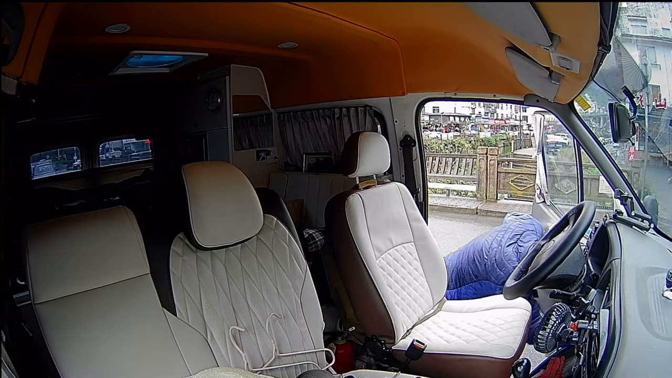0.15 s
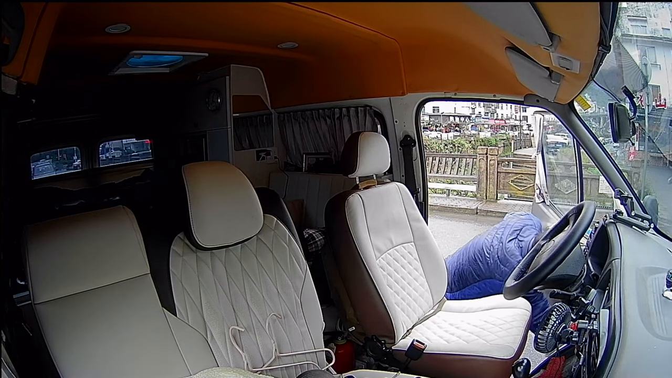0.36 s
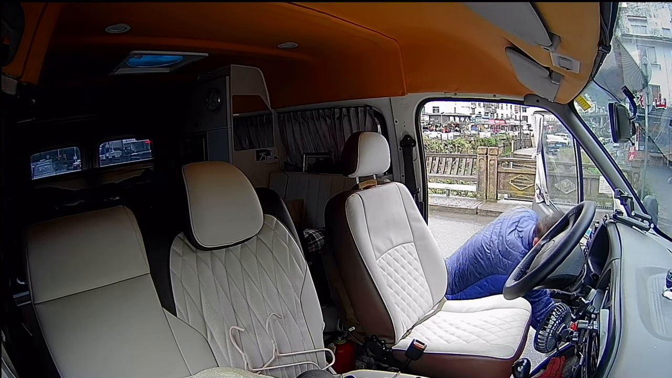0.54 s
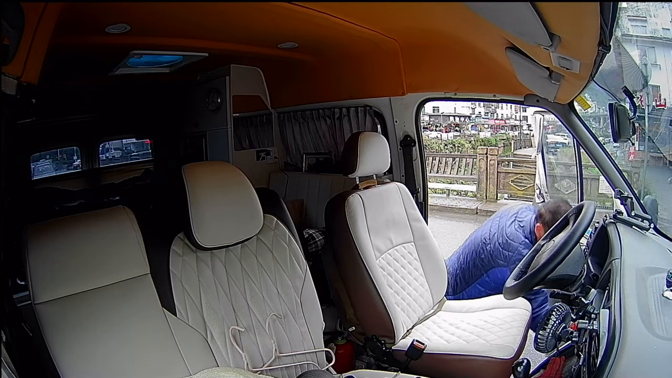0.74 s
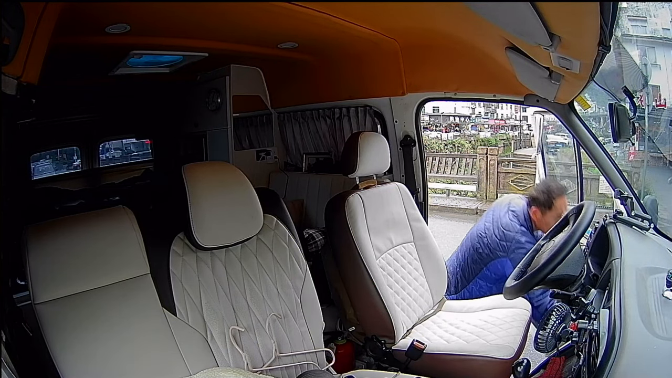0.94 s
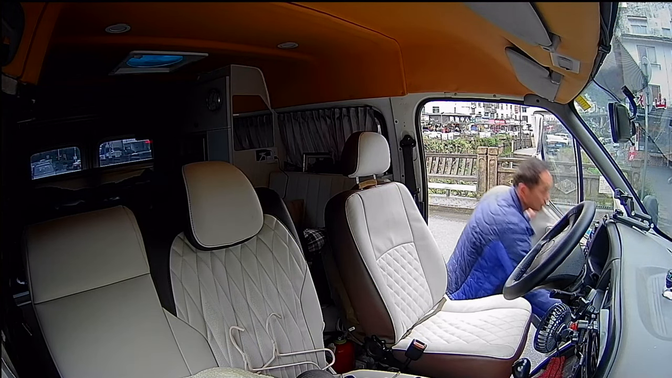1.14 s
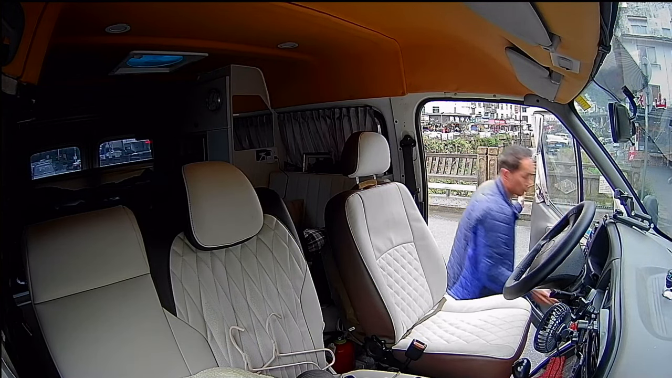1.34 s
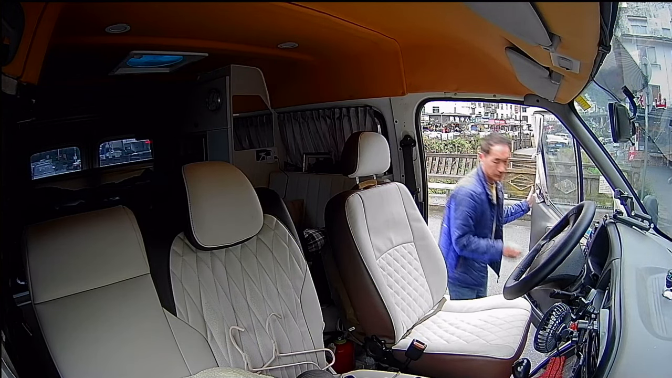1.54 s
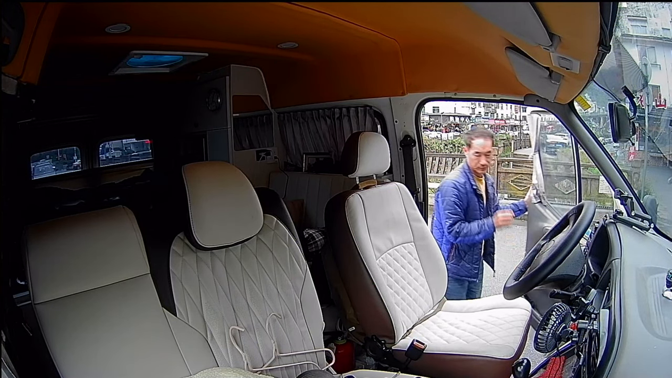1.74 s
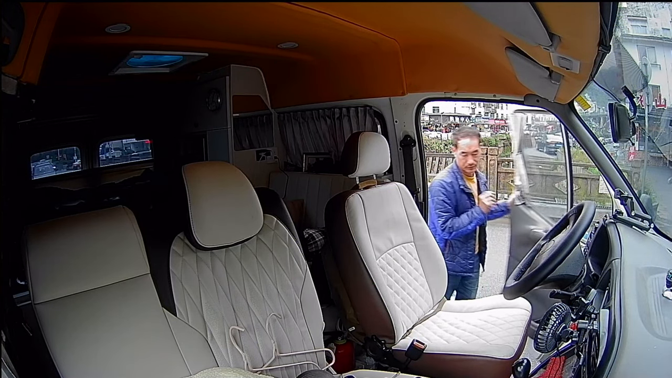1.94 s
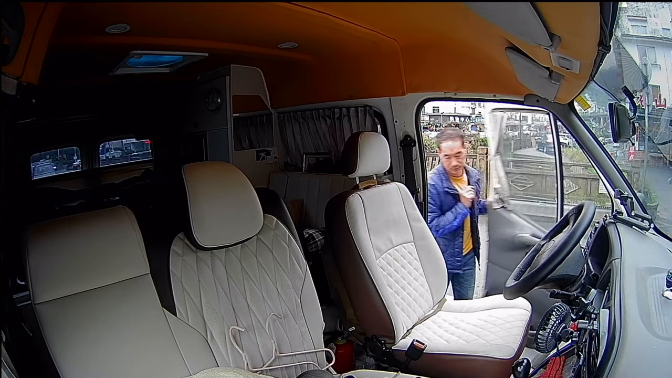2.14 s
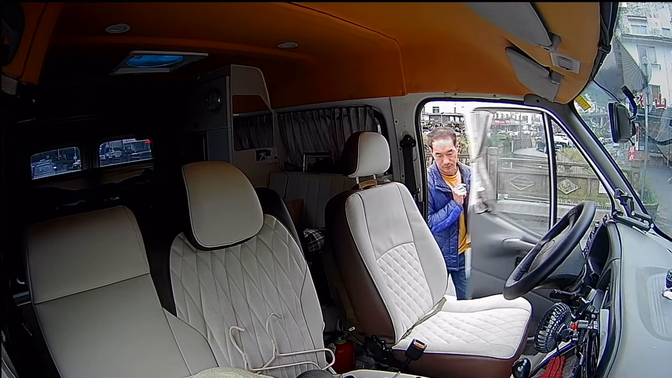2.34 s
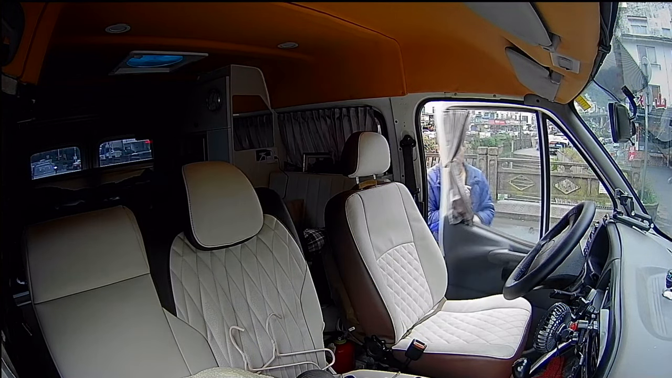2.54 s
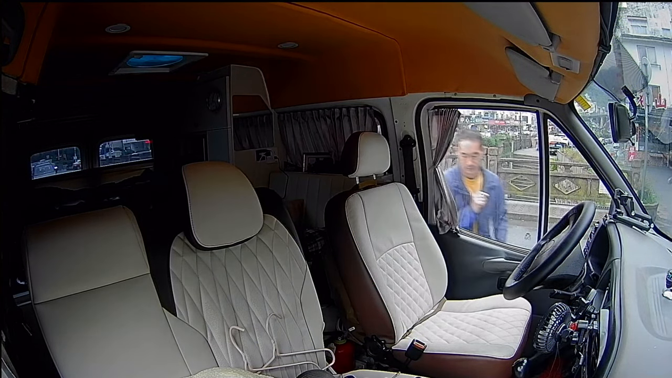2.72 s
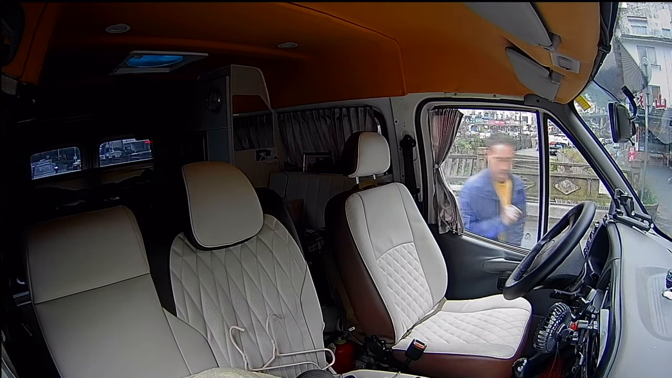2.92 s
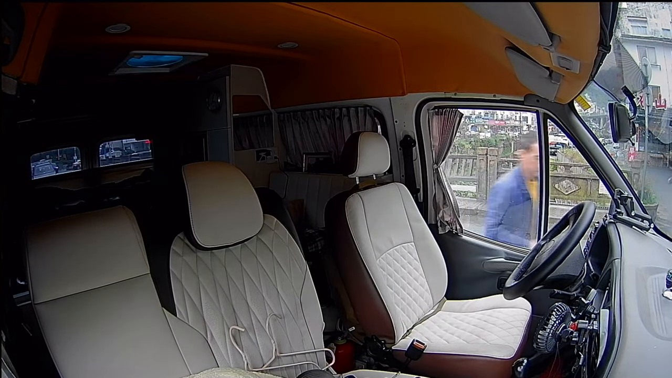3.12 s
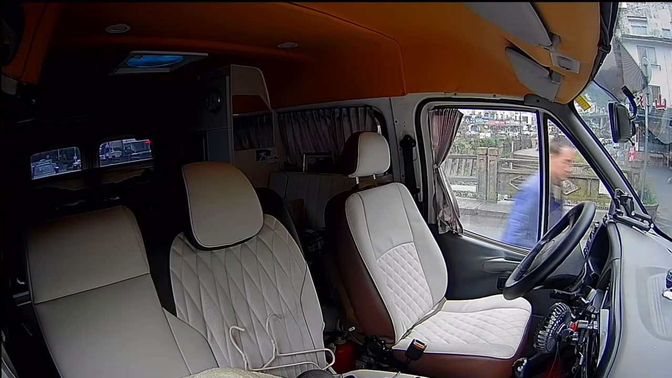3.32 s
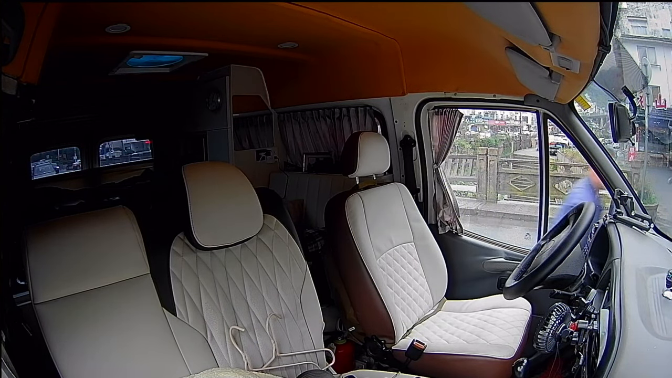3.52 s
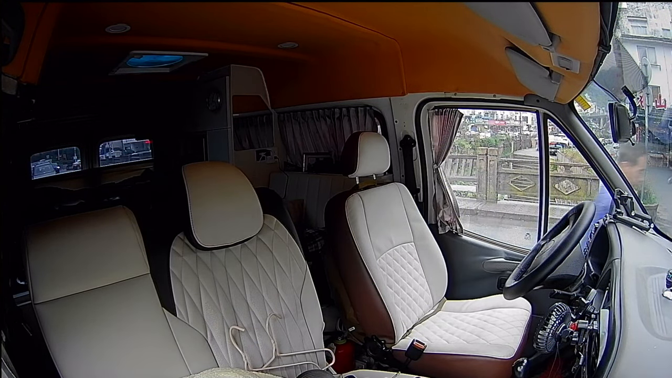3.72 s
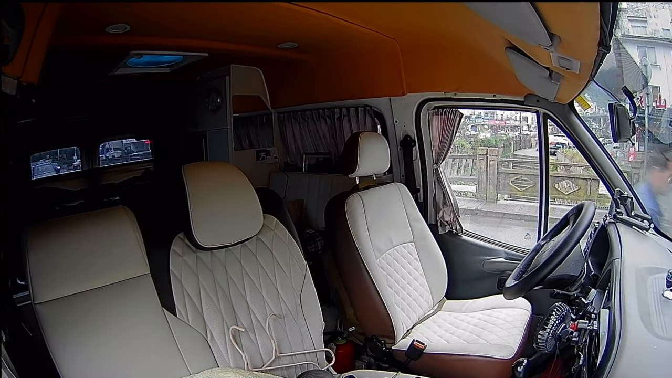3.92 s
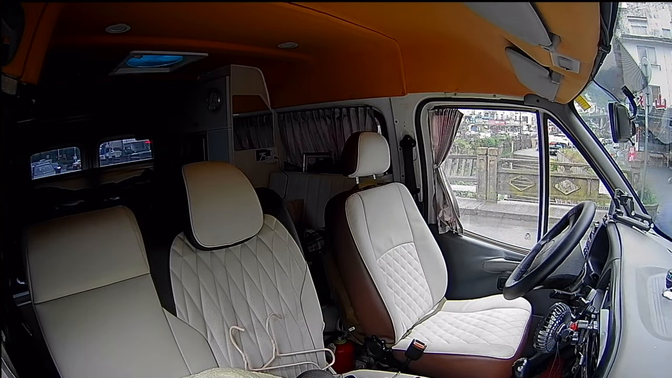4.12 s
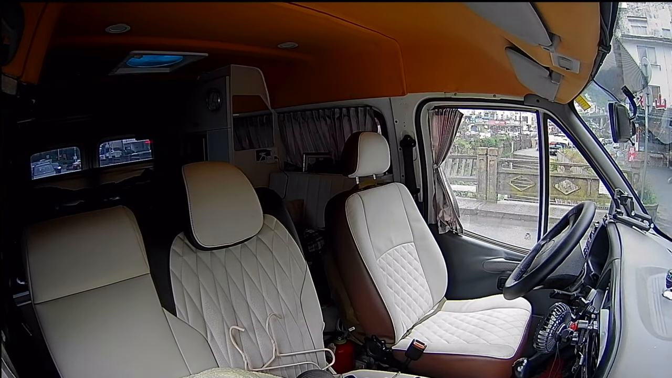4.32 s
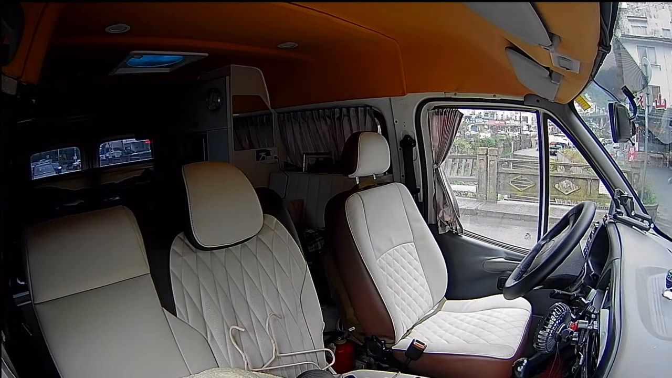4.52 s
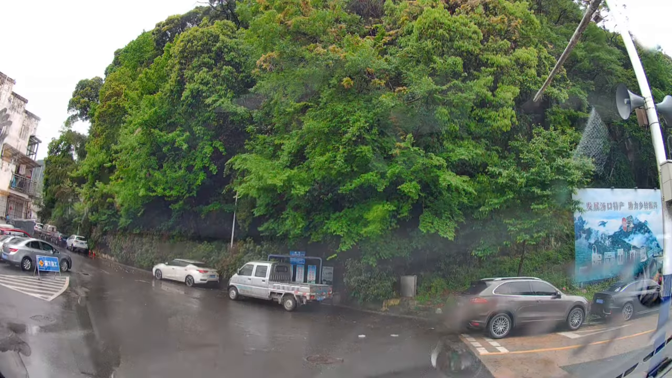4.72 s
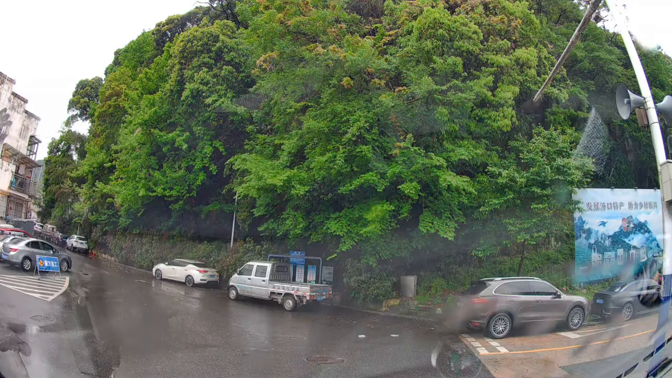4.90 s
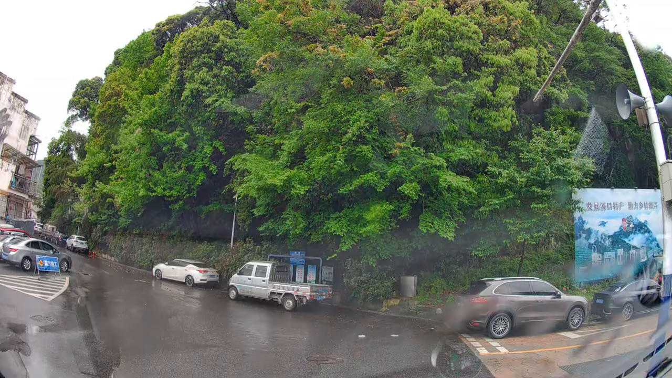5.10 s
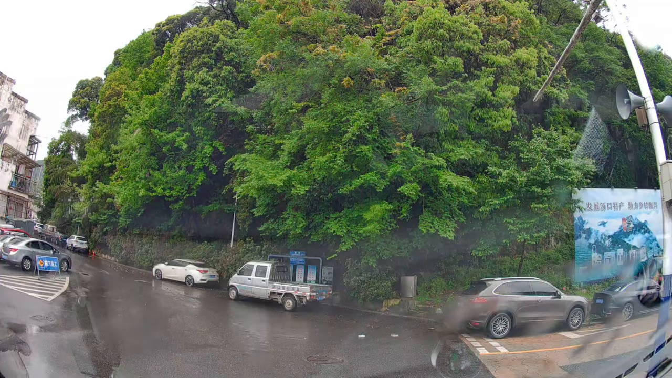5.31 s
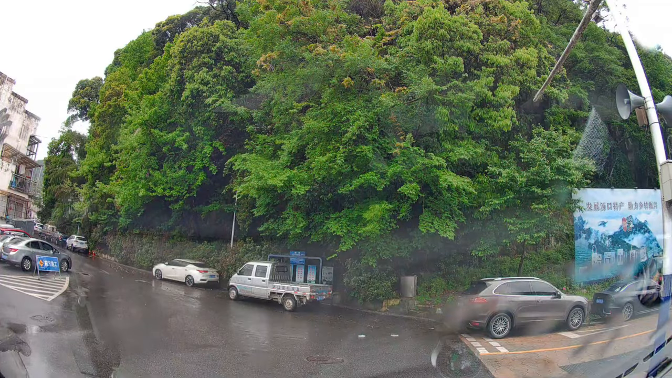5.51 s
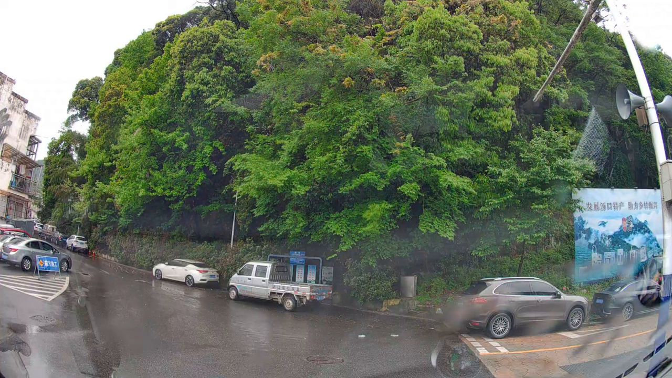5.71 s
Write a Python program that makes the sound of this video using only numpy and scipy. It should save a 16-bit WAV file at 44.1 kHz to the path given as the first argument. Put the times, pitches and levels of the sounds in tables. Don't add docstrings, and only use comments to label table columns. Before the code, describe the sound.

A microphone fixed inside a parked, idling van picks up soft wet-street wash through the open door, a low engine hum and floor rumble. Small taps from about 0.5 seconds lead into a dull, heavy double thump around 0.7 to 0.85 as a step shuts, swinging the body and knocking panels. Its low boom fades under scattered light taps until 2.5. The treble briefly dulls at 2.66, air is squeezed, and at about 2.78 the door slams: a very loud, overloaded bang with sharp metallic latch clicks, bouncing contacts, deep shell boom and bright trim rattle, mostly over by 3.1. The street is shut out; low resonance decays into a quiet cabin with faint idle and tiny quick valve clacks. At 4.66 a harsh pop jumps abruptly back into the slam's ringing boom and rattle, which fades again to quiet hum and ticking by the end.

```python
import sys
import numpy as np
from scipy import signal
from scipy.fft import rfft, irfft
from scipy.io import wavfile
from scipy.ndimage import uniform_filter1d

SR = 44100
rng = np.random.default_rng(int(sys.argv[2]) if len(sys.argv) > 2 else 0)


def materialize(psi):
    bounded = np.clip(np.atleast_2d(psi).T, -1, 1)
    quanta = np.round(bounded * 32767).astype(np.int16)
    wavfile.write(sys.argv[1], SR, quanta)


def ratio(d):
    e = np.asarray(d, float) / 20
    return 10 ** e


N = 258204
T = np.arange(N) / SR
SHUT_S = 2.78


def unit(x):
    return x / np.sqrt(np.mean(x ** 2))


def ring(x, hz, width_hz):
    return signal.lfilter(*signal.iirpeak(hz, hz / width_hz, SR), x)


def band(x, lo_hz, hi_hz):
    return signal.sosfilt(signal.butter(3, [lo_hz, hi_hz], "band", fs=SR, output="sos"), x)


def fade(start_s, t60_s, rise_s):
    age = np.maximum(T - start_s, 0)
    return np.minimum(age / rise_s, 1) * np.exp(-np.log(1000) * age / t60_s)


def walk(rate_hz):
    hold = int(SR / rate_hz)
    levels = np.repeat(rng.standard_normal(N // hold + 1), hold)
    return uniform_filter1d(uniform_filter1d(levels, hold), hold)[:N]


def wash(spectrum, swell_db, flicker_db):
    hz = np.fft.rfftfreq(N, 1 / SR) + 1e-3
    f, db = np.transpose(spectrum)
    shape = ratio(np.interp(np.log(hz), np.log(f), db, -120, -120))
    noise = rfft(rng.standard_normal(N)) * shape
    place = 2 * np.log2(hz / 10)
    swell = walk(1.5)
    out = 0
    for k in range(21):
        part = irfft(noise * np.clip(1 - abs(place - k), 0, 1), N)
        out = out + part * ratio(swell_db * swell + flicker_db * walk(11))
    return unit(out)


def cabin():
    # f/Hz, level/dB per Hz
    spectrum = [(12, -18), (21, 2), (33, -3.5), (50, -9), (96, -25.5), (172, -28.5), (412, -33),
                (657, -39.5), (1300, -40.5), (1600, -46.5), (2660, -48), (4950, -47.5), (7500, -45),
                (8100, -50), (10000, -59.5)]
    return ratio(-40) * wash(spectrum, 0.6, 1.4)


def street():
    # f/Hz, level/dB per Hz
    outside = [(100, -44.5), (170, -1.5), (338, -3), (417, -0.5), (460, -5), (569, 0.5), (638, -5.5),
               (715, 0), (829, -3.5), (1310, -3.5), (1470, -10), (2100, -9), (3270, -18), (6700, -10.5),
               (7700, -14.5), (10900, -26.5), (18500, -120)]
    # f/Hz, level/dB per Hz
    rumble = [(26, -28.5), (45, -5), (52, -8), (59, -14), (81, -7.5), (200, -15.5), (260, -40), (440, -120)]
    # t/s, level/dB
    opening = [
        (0, -39.5),
        (1.4, -39),
        (2.3, -42),
        (2.7, -45.5),
    ]
    # t/s, level/dB
    lurches = [
        (.72, -18.5),
        (1.98, -32),
        (2.35, -30.5),
        (2.85, -20),
    ]
    gap = np.clip((SHUT_S - T) / 0.05, 0, 1)
    shaking = gap * ratio(-52) + sum(ratio(db) * fade(s, 0.98, 0.21) for s, db in lurches)
    let_in = gap * ratio(np.interp(T, *np.transpose(opening)) + 2.5)
    return let_in * wash(outside, 0.99, 1.5) + shaking * wash(rumble, 0.6, 1.6)


def engine():
    idle_hz, idle_open_db, idle_shut_db = 33.3, -35, -43
    valve_start_s, valve_hz, valve_jitter_s, valve_db = 3.348, 7.93, 0.004, -58
    db = np.interp(T, [SHUT_S - 0.15, SHUT_S + 0.15], [idle_open_db, idle_shut_db])
    hum = np.sqrt(2) * ratio(db + 1.5 * walk(1)) * np.sin(2 * np.pi * idle_hz * T)
    chance = rng.standard_normal((15, 3))
    noise = rng.standard_normal(N)
    times = valve_start_s + np.arange(-3, 12) / valve_hz + valve_jitter_s * chance[:, 2]
    opens = sum(ratio(1.5 * c[0]) * fade(s, 0.16, 0.0046) for s, c in zip(times, chance))
    shuts = sum(ratio(1.6 * c[1]) * fade(s + 0.012, 0.12, 0.005) for s, c in zip(times, chance))
    bright = unit(ring(noise, 7250, 500) + 0.6 * ring(noise, 6350, 250))
    dull = unit(ring(noise, 4950, 300))
    return hum + ratio(valve_db) * (opens * bright + 1.05 * shuts * dull)


def taps():
    # t/s, level/dB, f/Hz
    open_taps = [(0.488, -33.5, 247), (.503, -23, 425), (0.511, -34.5, 970), (0.64, -33, 2620),
                 (0.647, -29.5, 383.7), (.649, -33, 2900), (0.708, -17, 157.4), (0.717, -30, 4340),
                 (.72, -17, 107.6), (0.662, -28, 2700), (0.761, -35.5, 2750), (.776, -27, 1534),
                 (.84, -22.5, 237), (1.089, -25.5, 299.5), (1.239, -37, 700), (1.549, -37, 390),
                 (1.55, -53, 198), (2.04, -34.5, 104), (2.14, -40.5, 111), (2.182, -38, 505),
                 (2.47, -35.5, 520), (2.501, -33, 223.2)]
    # t/s, level/dB,
    # f/Hz
    slam_taps = [(2.717, -26, 646), (2.761, -6, 398), (2.785, -5, 7310), (2.812, -16, 7423),
                 (2.888, -15.5, 540.6), (2.912, -17.5, 528.9), (2.922, -16.5, 518), (2.994, -29.5, 2187),
                 (3.005, -30.5, 106.5), (3.018, -38, 229.8), (3.033, -32.5, 3415), (3.049, -39, 172.8),
                 (3.087, -42.5, 6700), (3.089, -47, 6220), (3.15, -49, 484), (3.158, -49, 2428),
                 (3.16, -47.5, 6900), (4.027, -47.5, 7170)]
    noise = rng.standard_normal(N)
    out = 0
    for s, db, hz in open_taps + slam_taps:
        pitched = unit(ring(ring(noise, hz, 0.24 * hz), hz, 0.24 * hz))
        out = out + ratio(db) * fade(s, 0.028 + 40 / hz, 0.0013) * pitched
    return out


def shell(modes, pushes):
    age = np.arange(3 * SR) / SR
    swing = sum(g * np.sin(2 * np.pi * f * age) * np.exp(-np.log(1000) * age / t60) for f, g, t60 in modes)
    force = np.zeros(N)
    for s, strength in pushes:
        force[int(s * SR)] = strength
    return signal.fftconvolve(force, swing)[:N]


def struck(shake, modes, lo_hz, hi_hz, fill_db, grit_db):
    size = ratio(grit_db * rng.exponential(size=N))
    grit, dense = unit(rng.standard_normal((2, N)) * size)

    def part(level):
        peaks = sum(ratio(db) * ring(grit * level, f, w) for f, w, db in modes)
        return band(peaks + ratio(fill_db) * dense * level, lo_hz, hi_hz)
    return part(shake) / np.std(part(np.ones(N)))


def knocks(contacts, t60_s, trim_db, body, panel, fill_db):
    # f/Hz, width/Hz, level/dB
    trim = [(4710, 120, -6), (5200, 120, -7), (5899, 32, -7.5), (6285, 220, -2.5), (6865, 170, -0.5),
            (6900, 300, 1), (7070, 120, 0.3), (7580, 160, 0), (7040, 110, -0.5)]
    fades = [(db, hard, fade(s, t60_s * 2 ** (-hard / 60.5), 0.0012)) for s, db, hard in contacts]
    low = sum(ratio(db) * f for db, hard, f in fades)
    mid = sum(ratio(db + hard) * f for db, hard, f in fades)
    linger_db, linger_t60_s = -18.5, 0.67
    keep = ratio(-60 / (linger_t60_s * SR))
    low = low + ratio(linger_db) * signal.lfilter([1 - keep], [1, -keep], low)
    thud = ratio(-5) * struck(low, body, 93, 729, fill_db, 0.76)
    clatter = ratio(-11) * struck(mid, panel, 450, 5400, fill_db, 1.4)
    rattle = ratio(-5) * struck(ratio(trim_db) * mid, trim, 5100, 9500, -9.5, 1.0)
    return thud + clatter + rattle


def step():
    # f/Hz, signed share, t60/s
    modes = [(16.1, .075, 1.55), (20.9, -.368, 1.2), (24.8, -.594, 2.34), (25.1, 1., .69), (39.3, .111, .5),
             (53.5, -.041, .12), (70, .019, 1.05), (85.9, .134, .75)]
    # t/s, strength (outward positive)
    pushes = [
        (0.6979, 0.459),
        (0.7019, -0.113),
        (0.7409, -0.904),
        (0.7598, -1.504),
        (0.7682, 0.361),
        (0.7963, 1.039),
        (0.8358, -0.81),
        (0.8535, -0.727),
        (0.9531, -0.099),
        (1.0806, -0.042),
    ]
    # t/s, level/dB, hardness/dB (panel over body)
    contacts = [(0.648, -22, 9), (0.661, -18.5, -4.5), (0.679, -17, -10.5), (0.705, -16, -1.5),
                (0.719, -12.5, -4), (0.743, -9.5, -18), (0.762, -15, -0.57), (0.776, -19, -4),
                (0.797, -18.5, -7), (0.829, -29, -6), (0.859, -30, -20), (0.919, -33, 7), (1.09, -23, 5),
                (1.149, -34, 1.5)]
    # f/Hz, width/Hz, level/dB
    body = [(89.7, 8.1, -6), (137.7, 16.5, 2), (169.4, 26, -2), (216, 36, -10), (266, 25, -2.5),
            (365, 17, -22), (440, 12, -25)]
    # f/Hz, width/Hz, level/dB
    panel = [(830, 100, 10), (994, 210, 11), (1230, 130, 4.5), (1730, 400, -9), (2160, 110, -11.5),
             (2660, 59, 2), (3240, 150, -10.5)]
    return shell(modes, pushes) + knocks(contacts, 0.12, -17.5, body, panel, -18)


def air():
    # t/s, pressure (full scale 1)
    swing = [
        (2.655, 0),
        (2.71, .26),
        (2.74, .36),
        (2.79, .05),
        (2.797, 0),
    ]
    # t/s, pressure (full scale 1)
    puffs = [
        (2.7975, -.66),
        (2.8045, -.6),
        (2.828, .36),
        (2.839, -.1),
        (2.882, .32),
        (2.935, .6),
    ]
    half_s = 0.0066
    bursts = sum(p * np.clip(1 - abs(T - s) / half_s, 0, 1) for s, p in puffs)
    return uniform_filter1d(np.interp(T, *np.transpose(swing)) + bursts, size=200)


def slam():
    # f/Hz, signed share, t60/s
    modes = [(9.6, 0.32, 0.33), (20.1, 1.0, 1.11), (19.0, -0.517, 0.68), (23.8, -0.164, 3.34),
             (30.3, -0.221, 1.62), (37.7, -0.997, 0.3), (39.3, 0.874, 1.47), (43.9, 0.108, 0.96),
             (49.9, -0.039, 1.39), (59.0, -0.017, 1.61), (70.4, 0.073, 0.89), (75.2, -0.036, 0.57)]
    # t/s, strength (outward positive)
    pushes = [
        (2.7731, -1.085),
        (2.789, -1.37),
        (2.8105, 0.655),
        (2.8255, 1.727),
        (2.8543, -1.012),
        (2.8665, -0.682),
        (2.9106, -0.895),
        (2.9142, 0.43),
        (2.9269, -0.727),
    ]
    # t/s, level/dB, hardness/dB (panel over body)
    contacts = [(2.7155, -18.5, -5.5), (2.735, -19, -19), (2.7625, -18.5, 30), (2.768, -25, 20.5),
                (2.782, -20.5, 18.5), (2.789, -19.5, 14.5), (2.81, -12.5, -1.5), (2.839, -5.5, -4),
                (2.859, -11, -3), (2.886, -11, 4), (2.903, -19.5, -5), (2.921, -16.5, 3.5),
                (2.946, -27.5, -2.5), (2.968, -37.5, 12.5), (2.995, -31.5, 6), (3.036, -41.5, 10.5),
                (3.06, -47.5, 6)]
    # f/Hz, width/Hz, level/dB
    body = [(116.85, 4, 8.5), (140.6, 6.1, 17), (167.6, 8.7, 8), (198.9, 3.6, 6), (257.4, 24, 8.5),
            (257.8, 14, -8.5), (390, 42, 0.5), (469.2, 70, 0), (520, 18.2, -2)]
    # f/Hz, width/Hz, level/dB
    panel = [(674, 270, -5.5), (930, 60, -3), (1054, 52, 4.5), (1225, 36, 5), (1870, 39, -2.5),
             (2124, 58, -6.5), (2520, 120, -6), (3189, 180, 0.5), (3484, 71, 0), (3733, 52, -8.5),
             (3830, 110, 1), (4256, 36, -4.5), (4380, 45, -4)]
    return 1.05 * shell(modes, pushes) + air() + knocks(contacts, 0.14, -10, body, panel, -1.5)


def scene():
    return (cabin() + street() + engine() + taps() + step() + slam())[None]


def lowpass(x, hz):
    return signal.sosfiltfilt(signal.ellip(10, 0.1, 50, hz, fs=SR, output="sos"), x)


def top_cut(x):
    return signal.sosfilt(signal.butter(12, 16400, fs=SR, output="sos"), x)


def record(dry):
    # start t/s, end t/s
    lost_s = (2.66, 2.782)
    skip_s, skip_back_s = 4.6582, 1.736009
    rail = np.clip(dry[0], -0.84, 0.84)
    full = lowpass(rail + 0.2 * np.tanh(dry[0] - rail), 8850)
    under = lowpass(full, 7800)
    full = under + ratio(-8) * (full - under)
    lost = uniform_filter1d(1.0 * ((T > lost_s[0]) & (T < lost_s[1])), size=90)
    x = full - lost * (full - lowpass(full, 4570))
    skip, back = int(skip_s * SR), int(skip_back_s * SR)
    x[skip:] = x[skip - back:N - back]
    age = np.maximum(T - skip_s, 0)
    plunge = -0.85 * np.exp(-(age / 0.0032) ** 4)
    ringing = -0.6 * np.exp(-age / 0.006) * np.sin(2 * np.pi * 580 * age)
    pop = (T > skip_s) * (plunge + ringing)
    hiss = ratio(-94) * rng.standard_normal(N)
    return top_cut(np.clip(1.085 * x + pop + hiss, -1, 1)[None])


dry = scene()
out = record(dry)
materialize(out)
```